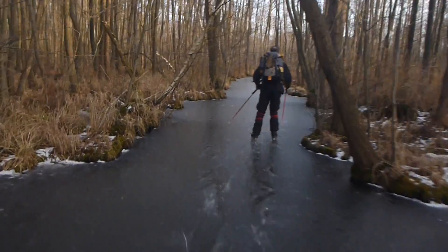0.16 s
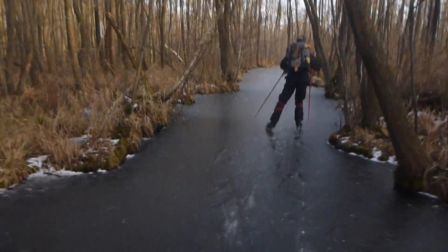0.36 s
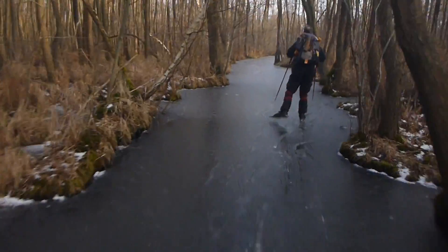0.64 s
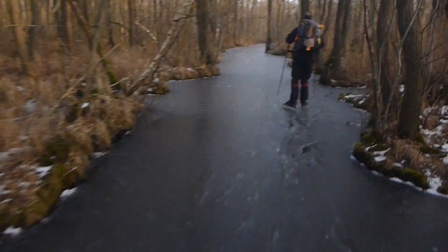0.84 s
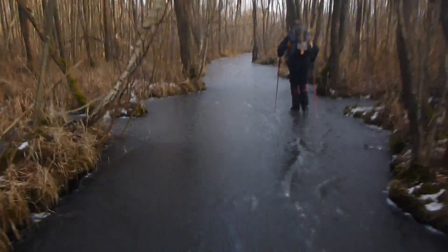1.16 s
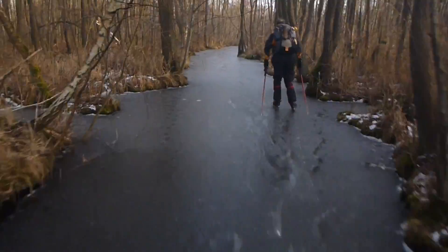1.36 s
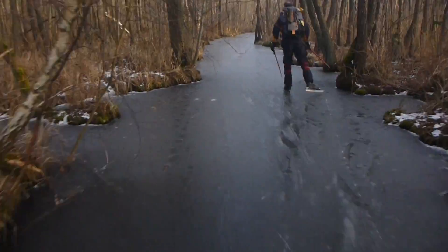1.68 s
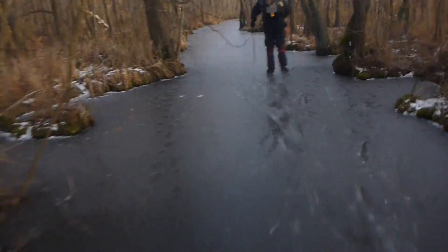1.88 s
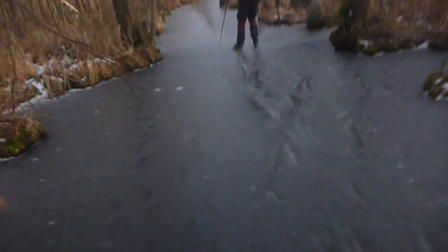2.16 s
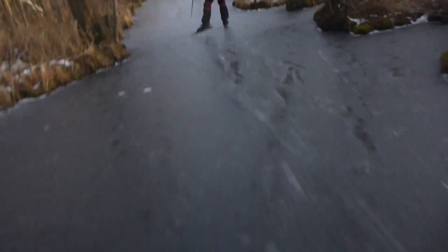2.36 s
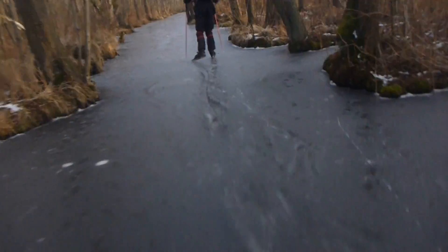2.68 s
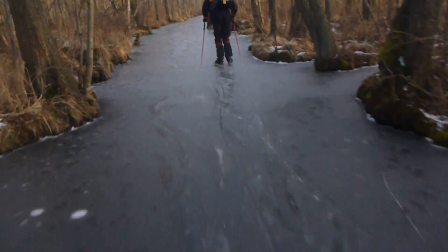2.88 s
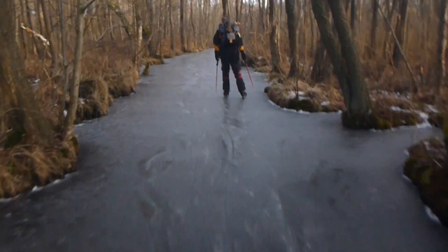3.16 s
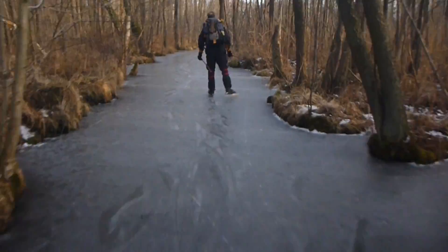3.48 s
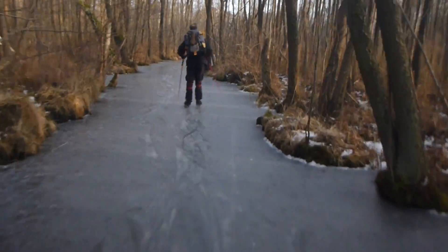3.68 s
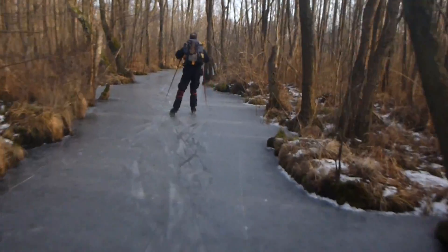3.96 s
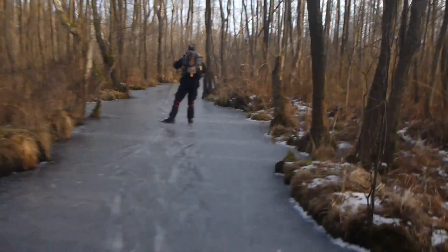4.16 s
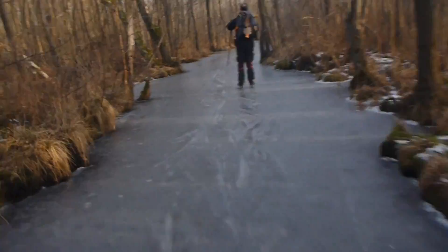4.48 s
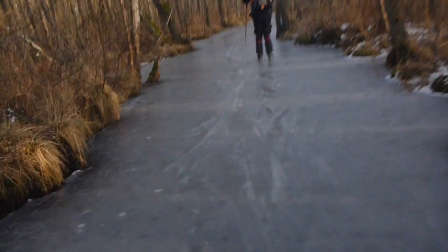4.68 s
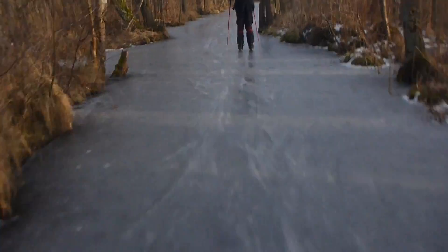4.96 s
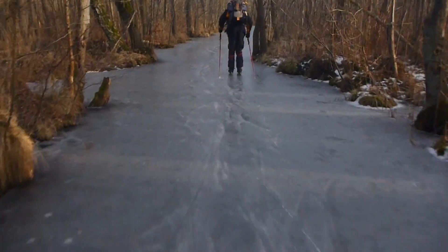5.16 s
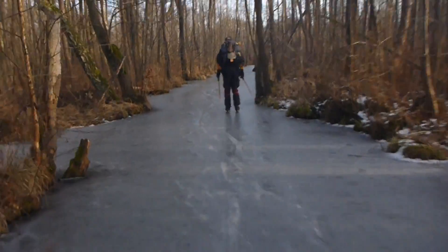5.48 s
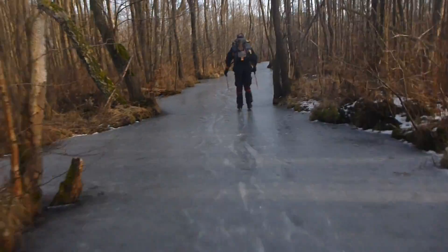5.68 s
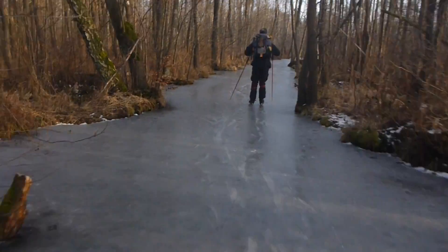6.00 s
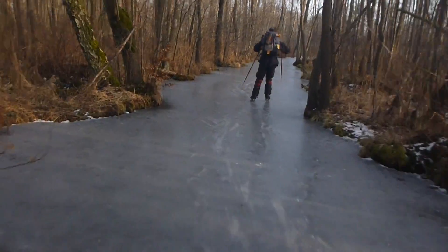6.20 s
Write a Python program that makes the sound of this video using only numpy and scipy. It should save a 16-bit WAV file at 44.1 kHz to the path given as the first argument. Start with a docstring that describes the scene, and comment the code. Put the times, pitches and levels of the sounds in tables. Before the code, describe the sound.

Steel skate blades grind and knock over rough natural ice in woodland, with one sharp snap and low wind buffeting the microphone.

```python
"""Skating on a frozen woodland stream

Steel blades grind and chatter over rough ice: clicks of breaking grains ring the skate and throw off chips.
Bursts of grains knock on ridges; one skid rings the steel, one sharp snap rings a few modes.
Moving air buffets the microphone: gust-shaped noise and short pressure cycles, over quiet woodland air."""
import sys
import numpy as np
from scipy import signal
from scipy.fft import rfft, irfft
from scipy.io import wavfile
from scipy.ndimage import uniform_filter1d

SR = 44100
rng = np.random.default_rng(int(sys.argv[2]) if len(sys.argv) > 2 else 0)


def store_wav(level_fs):
    """Save 16-bit WAV to argv[1]."""
    pcm = np.round(np.clip(np.atleast_2d(level_fs), -1, 1) * 32767)
    wavfile.write(sys.argv[1], SR, pcm.T.astype(np.int16))


N = 279153
TIME = np.arange(N) / SR


def amp(db):
    """Decibels to gain."""
    return 10 ** (np.asarray(db) / 20)


def evened(x):
    """Scales to rms 1."""
    return x / np.sqrt(np.mean(x ** 2) + 1e-20)


def steadied(x, size):
    """Holds the level near rms 1 over stretches of size samples, leaving faster flutter."""
    power = uniform_filter1d(uniform_filter1d(x ** 2, size), size)
    return x / np.sqrt(abs(power) + 1e-12)


def read(points, hz):
    """A spectrum's value at hz, on a log axis."""
    f, value = np.transpose(points)
    return np.interp(np.log(hz + 1), np.log(f + 1), value)


def colour(x, points, size=4096):
    """Causal minimum-phase filter of energy 1, shaped by the given spectrum."""
    log_gain = np.log(amp(read(points, abs(np.fft.fftfreq(size, 1 / SR)))))
    response = np.exp(np.conj(signal.hilbert(log_gain)))
    ring = np.fft.ifft(response).real[:size // 2]
    return signal.oaconvolve(x, ring / np.linalg.norm(ring))[:N]


def add(mix, s, sound):
    """Mixes a sound in at time s."""
    part = mix[max(round(s * SR), 0):][:len(sound)]
    part += sound[:len(part)]


def wander(hz):
    """Smooth random curve of rms 1, up to about hz changes a second."""
    f = np.fft.rfftfreq(N, 1 / SR)
    lowpass = np.exp(-(f / hz) ** 2)
    return evened(irfft(rfft(rng.standard_normal(N)) * lowpass, N))


def held(start_s, length_s, rise_s, fall_s):
    """Attack, hold and exponential release, 0 to 1."""
    t = TIME - start_s
    release = np.exp(-np.clip((t - length_s) / fall_s, 0, 20))
    return np.clip(t / rise_s, 0, 1) * release


def grit(per_s, spread_db):
    """Ice grains breaking: sparse random clicks; positive spread makes a few large, negative a few small."""
    size = amp(spread_db * np.minimum(rng.exponential(1, N), 4))
    clicks = rng.random(N) < per_s / SR
    return evened(size * rng.choice([-1, 1], N) * clicks)


# gusts on the microphone; brightness is small eddies against large
# start_s, length_s, level_rel_db, brightness_db
GUSTS = [(0, .11, -37, -20), (0.375, 0.15, -19.5, -19), (0.537, 0.094, -16, -16), (0.62, 0.076, -17, -9),
         (1.0, 0.093, -24.5, -14.5), (1.146, 0.063, -15, -17), (1.274, .10, -20.5, -8.5),
         (1.39, 0.35, -29, 1.5), (1.555, 0.1, -20.5, 2), (1.698, 0.049, -16, -15.5),
         (1.801, 0.13, -21, -7.5), (1.942, 0.18, -25, -9.5), (2.349, 0.17, -27.5, -14.5),
         (2.682, 0.059, -17.5, -10.5), (2.789, 0.097, -26, -14.5), (2.961, 0.015, -20, -15),
         (3.013, 0.021, -20.5, -11), (3.196, 0.032, -24, -11.5), (3.321, 0.065, -23.5, -11.5),
         (3.565, 0.27, -23.5, -15), (4.033, 0.096, -27.5, -12.5), (4.195, .11, -21, -17),
         (4.35, 0.071, -18.5, -7.5), (4.397, 0.091, -14.5, -13.5), (4.723, 0.12, -15, -14),
         (4.872, 0.24, -19.5, -12), (5.155, 0.078, -16.5, -3), (5.253, 0.1, -17, -3),
         (5.361, 0.064, -18, 2.5), (5.458, .10, -17.5, 2.5), (5.621, 0.2, -20, 1), (5.818, 0.068, -15, -17),
         (5.929, 0.099, -18, 1), (6.015, 0.057, -15.5, -16), (6.172, 0.041, -14.5, -13),
         (6.289, .05, -12.5, -11)]
GUST_RISE_S, GUST_FALL_S = 0.012, 0.024
BREEZE_REL_DB, BREEZE_BRIGHT_DB = -36, -15  # steady draught of moving along


def airflow():
    """Level and brightness of the air in dB: each gust jumps out of the draught, holds and drops away."""
    large = amp(BREEZE_REL_DB) ** 2
    small = large * amp(BREEZE_BRIGHT_DB) ** 2
    for start_s, length_s, db, bright_db in GUSTS:
        power = (amp(db) * held(start_s, length_s, GUST_RISE_S, GUST_FALL_S)) ** 2
        large = large + power
        small = small + power * amp(bright_db) ** 2
    return 10 * np.log10(large), 10 * np.log10(small / large)


# wind spectrum before the moving corner: freq_hz, density_rel_db
WIND_SPECTRUM = [(20, -44.5), (35, -42), (60, -13), (110, 3), (190, 2), (350, -2), (700, 1), (2000, 3),
                 (16000, -40.5)]


def wind(corner_hz=400 * 2 ** 0.76, db_per_octave=13, slope=3.5, shed_db=4, flutter_db=1.0,
         flutter_hz=45, swing_octaves=0.48, suction=0.17, trim_db=1.91):
    """Turbulence at the microphone: faster air sheds smaller eddies and lifts the corner of the rumble."""
    gust_db, bright_db = airflow()
    hz, t, z = signal.stft(rng.standard_normal(N), SR, nperseg=1024, noverlap=896)
    flutter = np.clip(wander(flutter_hz), -2, 1.5)
    octaves = bright_db / db_per_octave + swing_octaves * flutter
    corner = np.clip(corner_hz * 2 ** np.interp(t, TIME, octaves), 150, 620)
    ratio = hz[:, None] / corner
    shedding_db = shed_db * np.exp(-((ratio - .9) / 0.42) ** 2)
    rolloff = np.sqrt(1 + ratio ** (2 * slope))
    z = z * amp(read(WIND_SPECTRUM, hz)[:, None] + shedding_db) / rolloff
    noise = signal.istft(z, nperseg=1024, noverlap=896)[1][:N]
    rumble = steadied(noise * amp(flutter_db * flutter), size=1300)
    cores = np.clip(-rumble - 1, 0, 2) ** 3  # core of a strong eddy: sharp pressure dip
    highpass = signal.butter(2, 300, "high", fs=SR, output="sos")
    rumble = rumble - suction * signal.sosfilt(highpass, cores)
    return rumble * amp(gust_db + trim_db) * np.sqrt(1 + amp(bright_db) ** 2)


# woodland air: freq_hz, density_rel_db
WOODS_SPECTRUM = [(20, -31.5), (80, 27), (250, -10.5), (600, -24.5), (1500, -38), (3000, -25),
                  (8000, -34.5), (16000, -25.5)]


def woods_air(level_db=-46):
    """Quiet air of the woods: steady coloured noise."""
    return amp(level_db) * colour(rng.standard_normal(N), WOODS_SPECTRUM)


# blade strokes; swell runs from start to end of a stroke
# start_s, length_s, grind_rel_db, spray_rel_db, swell_db
STROKES = [(-.05, 0.55, -42, -57, 5), (0.888, 0.27, -43.5, -60, 7), (1.47, 0.5, -47.5, -59, 3),
           (1.951, 0.29, -46, -51, -18), (2.353, 0.19, -41, -52.5, -3), (2.582, 0.14, -43, -58.5, -7),
           (3.17, 0.69, -39, -50, 2.5), (3.863, 0.086, -38, -36.5, -14), (3.98, 0.299, -32.5, -46.5, 4),
           (4.521, 0.18, -30.5, -50.5, -5), (4.731, 0.48, -37, -52, 1), (5.205, 0.54, -44.5, -60, 0),
           (6.145, 0.16, -40.5, -57.5, -5)]
BITE_S, LIFT_S = 0.006, 0.039
COAST_REL_DB, COAST_SPRAY_REL_DB = -50.5, -60.5  # steady floor of grinding and spray under all strokes


def pressure():
    """Grinding and spray in dB: each stroke bites, swells or eases as the weight shifts, and lifts off."""
    grind, spray = amp(COAST_REL_DB) ** 2, amp(COAST_SPRAY_REL_DB) ** 2
    for start_s, length_s, grind_db, spray_db, swell_db in STROKES:
        progress = np.clip((TIME - start_s) / length_s, 0, 1)
        weight = held(start_s, length_s, BITE_S, LIFT_S) * amp(swell_db * (progress - .5))
        grind = grind + (weight * amp(grind_db)) ** 2
        spray = spray + (weight * amp(spray_db)) ** 2
    return 10 * np.log10(grind), 10 * np.log10(spray)


# ring of the skate: freq_hz, density_rel_db
SKATE_SPECTRUM = [(100, -4.5), (350, 6.5), (700, 1.5), (1000, 5), (1250, 1.5), (1650, 1), (1820, 2),
                  (1930, 1), (2040, -0.5), (2300, -5), (2700, -16), (3400, -19.5), (5000, -26),
                  (12000, -55.5)]
# crunch and spray of ice chips: freq_hz, density_rel_db
CHIPS_SPECTRUM = [(800, -17.5), (2400, 9), (3400, 5.5), (4200, -0.5), (5200, 2), (6200, -3), (7400, -5),
                  (8900, -7.5), (9700, -7), (10400, -8.5), (13000, -8), (15300, -10.5), (17000, -16.5)]


def glide(grind_db, spray_db, grind_trim_db=0.5, spray_trim_db=2.0, bump_db=4.0, spray_bump_db=3,
          bump_hz=80, tick_db=-6):
    """Bumps in the ice press the blade in clumps of grains that ring the skate and throw off chips."""
    bumps = np.clip(wander(bump_hz), -2, 2)
    body = steadied(grit(per_s=1300, spread_db=2.5) * amp(bump_db * bumps), size=3000)
    chips = steadied(grit(per_s=15000, spread_db=-3.5) * amp(spray_bump_db * bumps), size=3000)
    ticks = amp(tick_db) * grit(per_s=13, spread_db=2.0)  # single flakes that crack off
    grinding = colour(body * amp(grind_db + grind_trim_db), SKATE_SPECTRUM)
    spraying = colour((chips + ticks) * amp(spray_db + spray_trim_db), CHIPS_SPECTRUM)
    return grinding + spraying


def shifting(x, depth_db=3):
    """The contact point travels along the blade, so each moment favours other resonances."""
    z = signal.stft(x, SR, nperseg=256, noverlap=192)[2]
    patches = uniform_filter1d(rng.standard_normal(z.shape), size=4, axis=0)
    patches = evened(uniform_filter1d(patches, size=10, axis=1))
    z = z * evened(amp(depth_db * np.clip(patches, -2, 2)))
    return signal.istft(z, nperseg=256, noverlap=192)[1][:N]


def banks(x, t60_s=0.12, wet_db=-19):
    """Faint scatter from the banks and trunks: sparse random echoes after 6 ms, decaying."""
    t = np.arange(SR // 2) / SR
    echoes = rng.standard_normal(len(t)) * (rng.random(len(t)) < .05)
    tail = echoes * amp(-60 * t / t60_s) * (t > .006)
    return amp(wet_db) * signal.oaconvolve(x, tail / np.linalg.norm(tail))[:N]


# single strong eddies: centre_s, level_rel_db, centre_pitch_hz
BUFFETS = [(0.076, -12, 123), (0.415, -4.5, 244.5), (0.568, -7.5, 237), (1.293, -6, 326), (1.36, -8, 322),
           (1.905, -7.5, 554), (1.98, -4.5, 284), (2.149, -10, 323), (2.45, -12.5, 275.4),
           (2.519, -11, 345), (2.698, -3.5, 242), (2.882, -9.5, 236.3), (3.835, -1, 257.6),
           (4.062, -7, 146.6), (4.304, -6.5, 154), (4.43, -17, 236), (5.169, -1, 278), (5.854, -1.5, 271.4)]


def buffets(width_s=0.0031, sag=0.204, suction=1.0, trim_db=-2.0):
    """Each strong eddy is a few cycles of pressure that slow as it passes, with a sharp dip at its core."""
    out, t = np.zeros(N), np.arange(-1300, 1300) / SR
    for (centre_s, db, hz), phase in zip(BUFFETS, rng.random(len(BUFFETS))):
        pitch_hz = hz * (1 - sag * np.tanh(t / width_s))
        turns = np.cumsum(pitch_hz) / SR + phase
        wave = np.sin(2 * np.pi * turns) / np.cosh(t / width_s * np.sqrt(2))
        core = np.minimum(wave, 0) ** 4
        add(out, centre_s + t[0], amp(db + trim_db) * (wave - suction * core))
    return out


RIDGES_PER_S, RIDGE_SPREAD_DB, RIDGE_DECAY_S = 6, 5.5, 0.0023
RIDGE_RING_DB, RIDGE_CRUNCH_DB = 16.5, 5.5  # above grind, above spray


def small_ridges(grind_db, spray_db):
    """Small ridges come by chance and hit as hard as the blade grinds; rows like those of KNOCKS."""
    hits = np.flatnonzero(rng.random(N) < RIDGES_PER_S / SR)
    size_db = RIDGE_SPREAD_DB * (2 * rng.random(N) - 1)
    ring_db = grind_db + RIDGE_RING_DB + size_db
    crunch_db = spray_db + RIDGE_CRUNCH_DB + size_db
    return [(i / SR, ring_db[i], crunch_db[i], RIDGE_DECAY_S) for i in hits]


# blades hitting ridges: start_s, skate_ring_rel_db, ice_crunch_rel_db, decay_s
KNOCKS = [(0.371, -27.5, -41, 0.0097), (0.435, -26, -33, 0.0036), (0.472, -23.5, -52, 0.0041),
          (0.581, -20, -48, 0.0013), (0.603, -30, -41.5, 0.004), (0.739, -32, -56, 0.003),
          (0.822, -25.5, -41.5, 0.0098), (0.899, -28.5, -43, 0.005), (1.013, -23.5, -48, 0.006),
          (1.035, -19, -41, 0.0039), (1.072, -25, -47, 0.0035), (1.105, -20, -36, 0.0041),
          (1.215, -23.5, -40, 0.0058), (1.29, -32, -32, 0.0029), (1.435, -25, -41.5, 0.0033),
          (1.549, -24, -43, 0.011), (1.854, -18, -31.5, 0.0018), (1.965, -13, -21.5, 0.0022),
          (2.142, -15.5, -30, 0.0033), (2.431, -48, -24.5, 0.0022), (2.514, -21.5, -34, 0.0021),
          (2.63, -44, -24.5, 0.0015), (2.793, -36, -35.5, 0.0054), (2.835, -20, -26, 0.0045),
          (3.024, -19, -40, 0.002), (3.032, -19.5, -25.5, 0.0036), (3.063, -23, -40, 0.0096),
          (3.123, -16, -31, 0.0052), (3.201, -11.5, -29, 0.00088), (3.345, -18, -49, 0.0035),
          (3.455, -17.5, -36, 0.0081), (3.531, -21, -53, 0.0081), (3.64, -21.5, -35.5, 0.015),
          (3.753, -27, -52, 0.0038), (3.867, -22, -21.5, 0.0059), (3.876, -12, -23, 0.0044),
          (3.914, -27.5, -42, 0.009), (4.014, -27, -50, 0.0044), (4.113, -17, -29, 0.0037),
          (4.124, -7.5, -21.5, 0.0029), (4.257, -25.5, -41, 0.024), (4.437, -19, -37, 0.012),
          (4.572, -15, -30, 0.0054), (4.664, -22.5, -52, 0.012), (4.758, -23, -38, 0.005),
          (4.824, -19.5, -37, 0.0069), (4.928, -31, -30, 0.0025), (5.047, -24, -32, 0.012),
          (5.14, -20.5, -32, 0.0054), (5.548, -19, -22, 0.0026), (5.673, -21, -25, 0.0042),
          (5.777, -17, -47, 0.006), (5.935, -34, -36, 0.0042), (6.132, -22.5, -33, 0.0039),
          (6.181, -21, -57, 0.0035), (6.233, -20.5, -34.5, 0.0031)]
# dull answer of the ice sheet to a blow: freq_hz, density_rel_db
SHEET_SPECTRUM = [(60, -27), (200, 1.5), (380, 6), (700, 0.5), (1500, -43.5), (6000, -62)]


def knocks(ridges, ring_trim_db=2, crunch_trim_db=0, thud_db=-6.5, rise=0.17, stop=1.22):
    """A ridge gives a sudden burst of breaking grains that rings the skate and thuds in the ice sheet."""
    ring, crunch, t = np.zeros(N), np.zeros(N), np.arange(SR // 8) / SR
    for start_s, skate_db, ice_db, decay_s in ridges:
        attack = 1 - np.exp(-t / (rise * decay_s))
        burst = np.exp(-(t / decay_s) ** stop / stop) * attack
        add(ring, start_s, amp(skate_db + ring_trim_db) * burst)
        add(crunch, start_s, amp(ice_db + crunch_trim_db) * burst)
    grains = ring * steadied(grit(per_s=13000, spread_db=1.5), size=120)
    splinters = crunch * steadied(grit(per_s=7800, spread_db=2.5), size=120)
    thud = amp(thud_db) * colour(grains, SHEET_SPECTRUM)
    return colour(grains, SKATE_SPECTRUM) + colour(splinters, CHIPS_SPECTRUM) + thud


# what the snap rings with: freq_hz, level_rel_db, t60_s
SNAP_MODES = [(1870, 1.5, 0.0031), (2840, 3, 0.0053), (3400, -3, 0.0092), (3990, -11.5, 0.011),
              (5050, -3, 0.01), (6180, -1, 0.0065), (9760, -4.5, 0.0054), (11000, -8, 0.0072),
              (13700, -5, 0.0084), (15000, -23, 0.0023), (15400, -4, 0.0046)]
SNAP_AT_S, SNAP_TRIM_DB = 2.248, -3.5


def snap():
    """One hard, very short blow on a few quickly dying modes of alternating sign."""
    out, modes, t = np.zeros(N), 0, np.arange(SR // 20) / SR
    for k, (hz, db, t60_s) in enumerate(SNAP_MODES):
        modes = modes + (-1) ** k * amp(db - 60 * t / t60_s) * np.sin(2 * np.pi * hz * t)
    add(out, SNAP_AT_S, amp(SNAP_TRIM_DB) * modes)
    return out


# what the chattering blade rings with: freq_hz, density_rel_db
CHATTER_SPECTRUM = [(500, -24), (1200, -11), (1600, 2), (1780, -4), (1980, 0), (2400, -9), (3500, -22),
                    (9000, -45)]
SKID_START_S, SKID_LENGTH_S, SKID_DB = 3.869, .022, -18.5
SKID_RISE_S, SKID_FALL_S = .008, .006


def skid():
    """The edge catches and slips in quick grains that ring the steel."""
    slips = steadied(grit(per_s=3000, spread_db=2), size=120)
    envelope = held(SKID_START_S, SKID_LENGTH_S, SKID_RISE_S, SKID_FALL_S)
    return colour(amp(SKID_DB) * envelope * slips, CHATTER_SPECTRUM)


def scene():
    """Skates with their scatter, the snap, the wind and the quiet air of the woods."""
    grind_db, spray_db = pressure()
    ridges = KNOCKS + small_ridges(grind_db, spray_db)
    skates = shifting(glide(grind_db, spray_db) + knocks(ridges)) + skid()
    air = wind() + buffets() + woods_air()
    return (skates + banks(skates) + snap() + air)[None]


# notches of the recorder's filter: centre_hz, width_hz
NOTCHES = [(2890, 230), (7835, 63), (11900, 1900)]
EDGE_HZ = 16200


def record(dry):
    """The recorder's notches, full-scale clipping, then the band limit."""
    sound = dry
    for hz, width_hz in NOTCHES:
        sound = signal.lfilter(*signal.iirnotch(hz, hz / width_hz, fs=SR), sound)
    lowpass = signal.firwin(255, EDGE_HZ, window=("kaiser", 9), fs=SR)
    return signal.oaconvolve(np.clip(sound, -1, 1), lowpass[None], "same")


dry = scene()
out = record(dry)
store_wav(out)
```